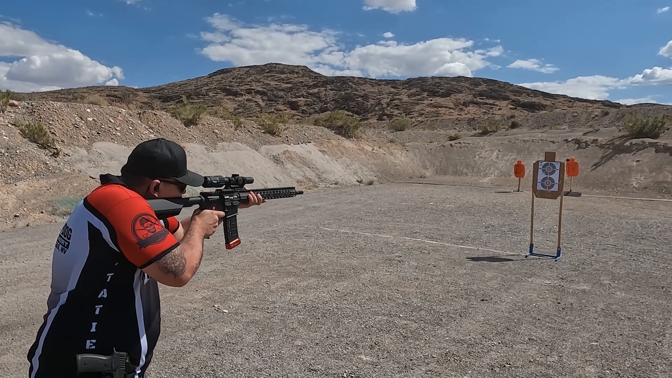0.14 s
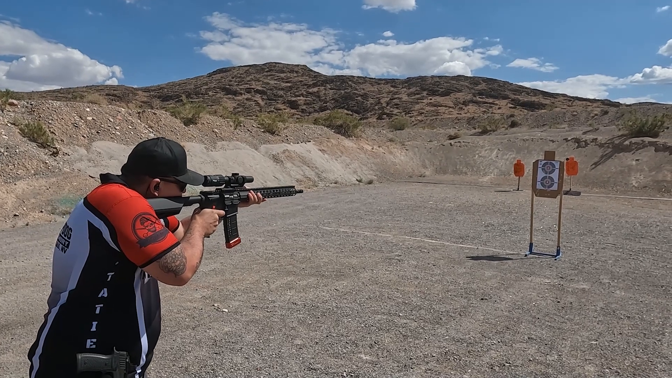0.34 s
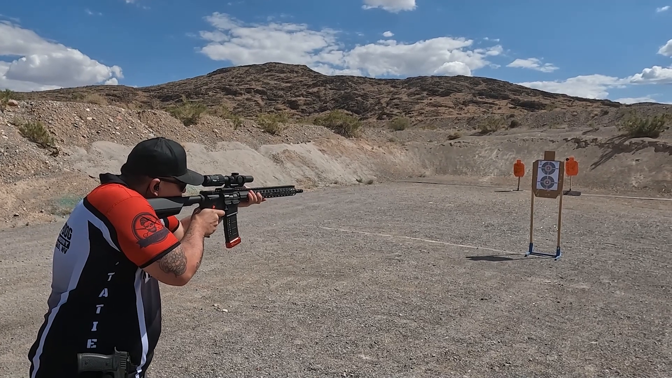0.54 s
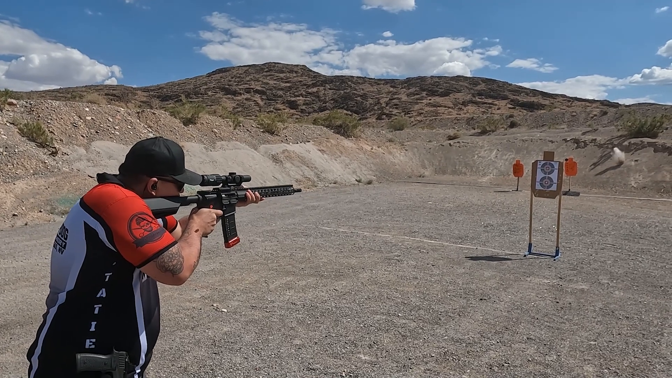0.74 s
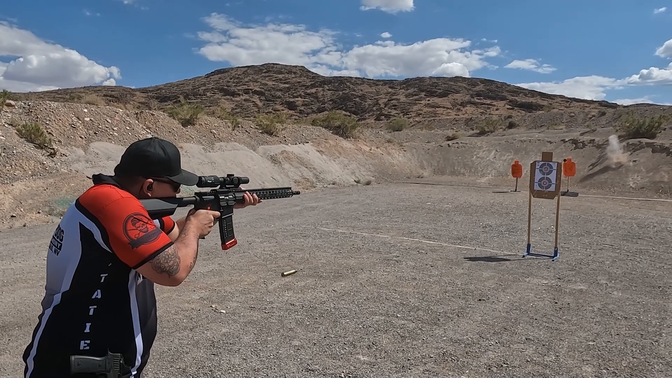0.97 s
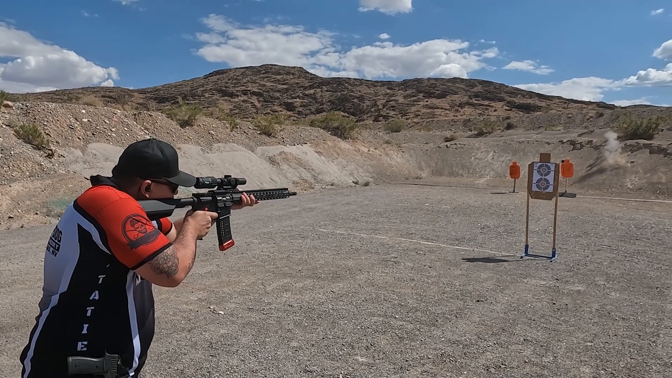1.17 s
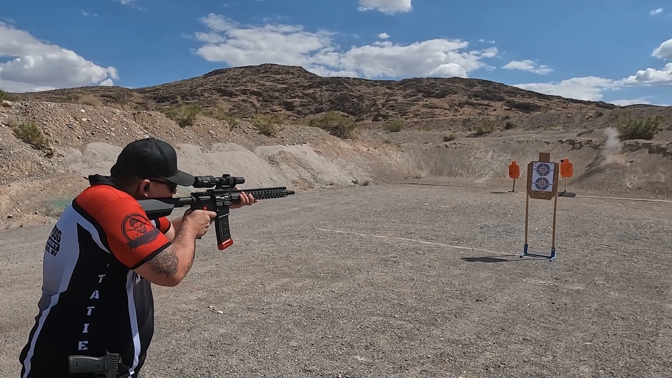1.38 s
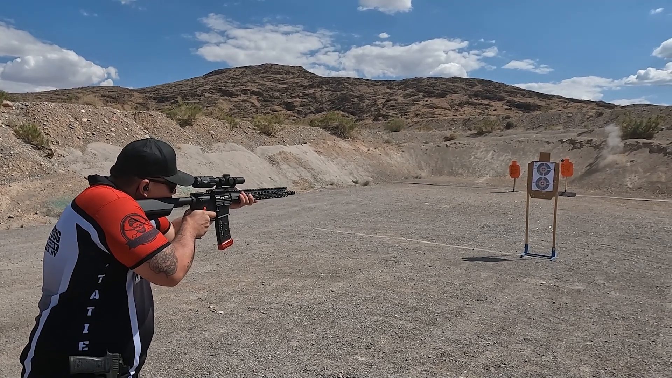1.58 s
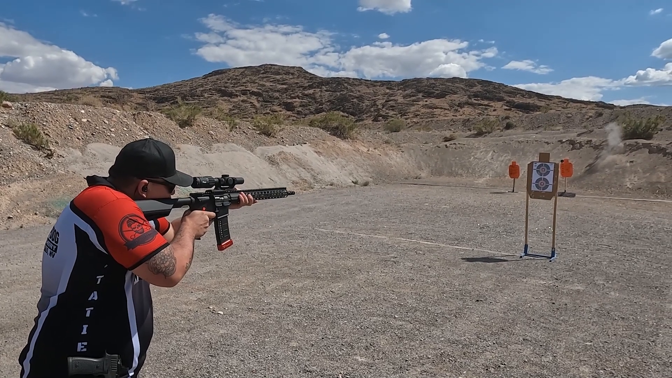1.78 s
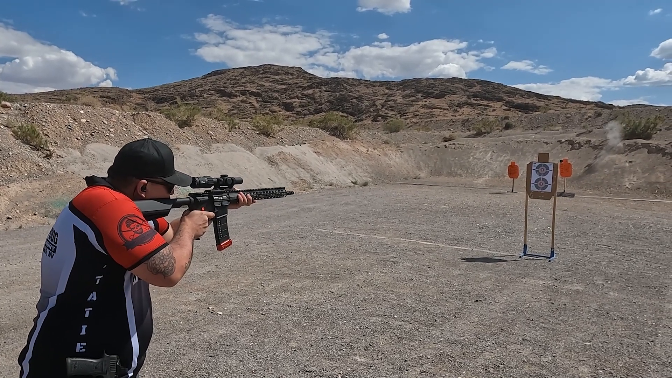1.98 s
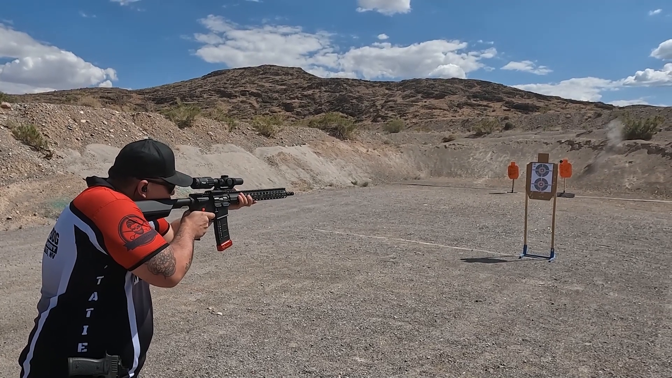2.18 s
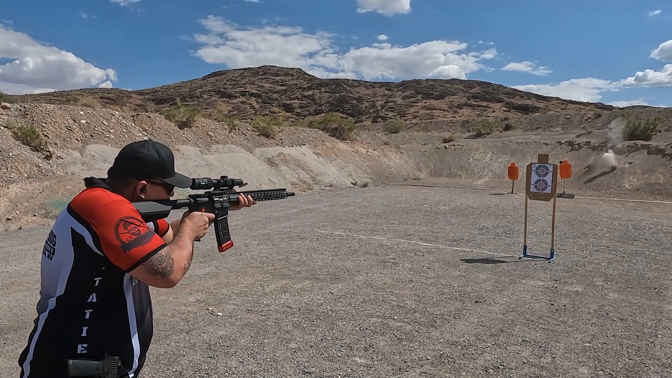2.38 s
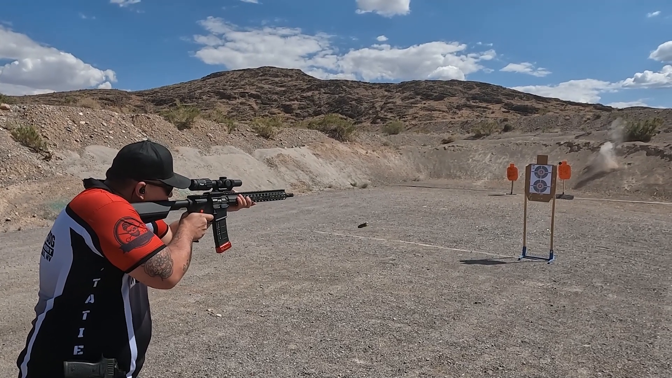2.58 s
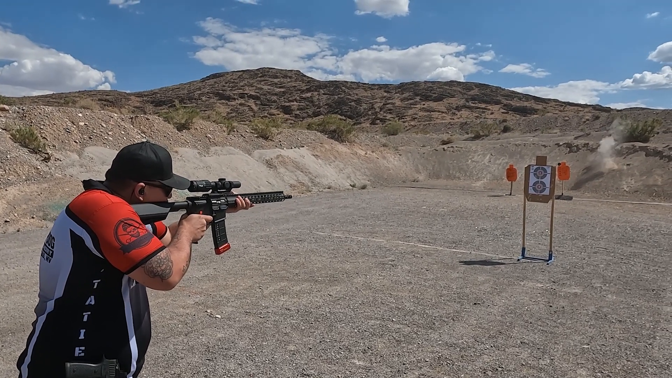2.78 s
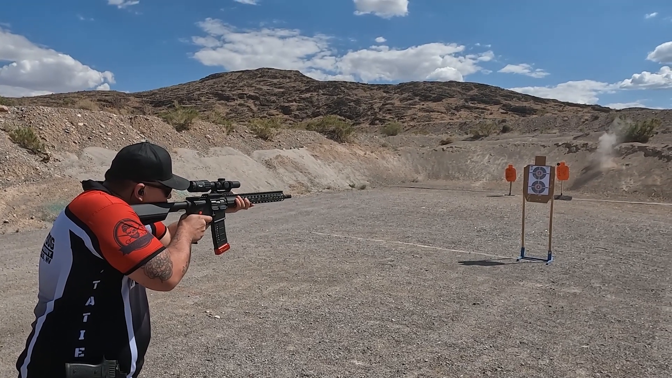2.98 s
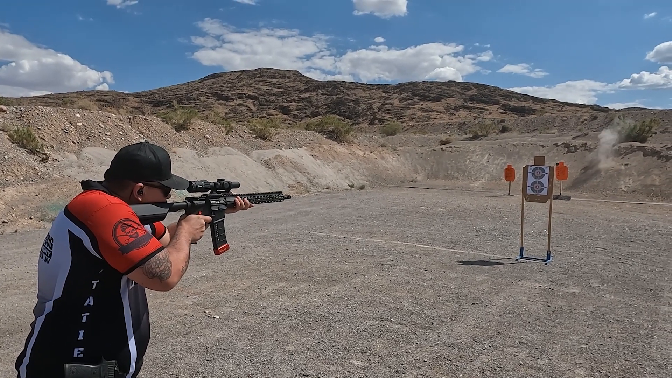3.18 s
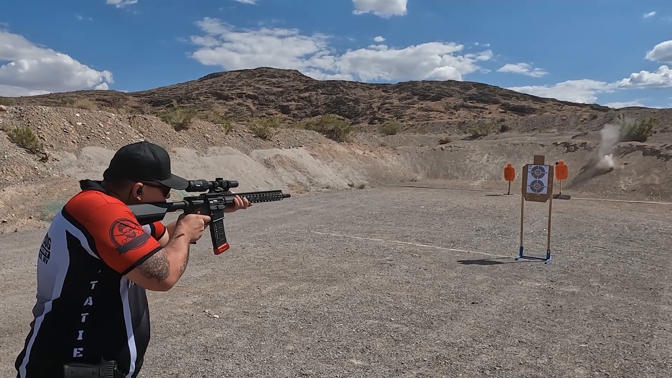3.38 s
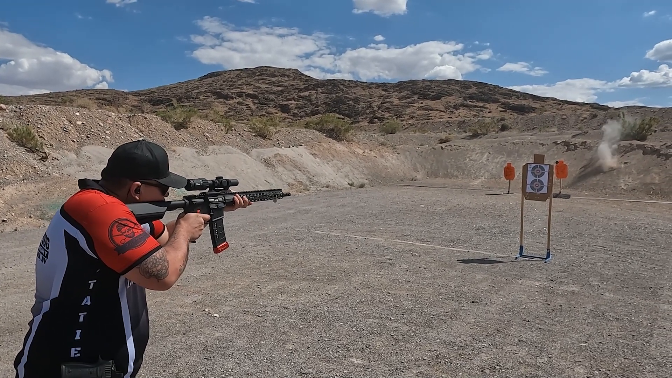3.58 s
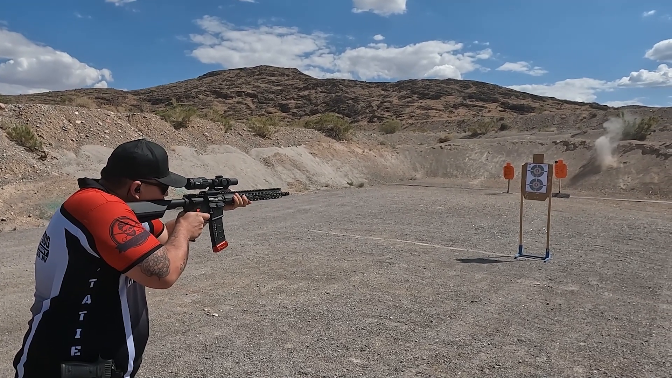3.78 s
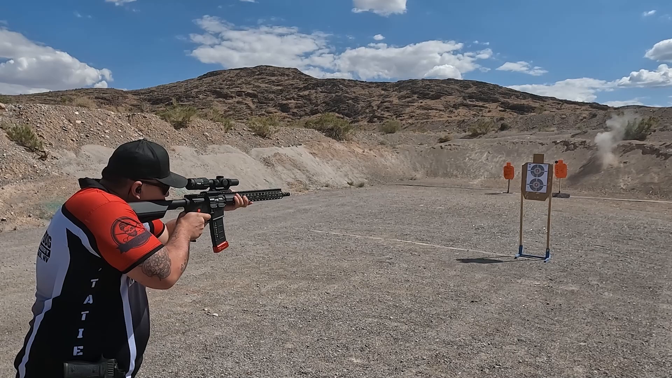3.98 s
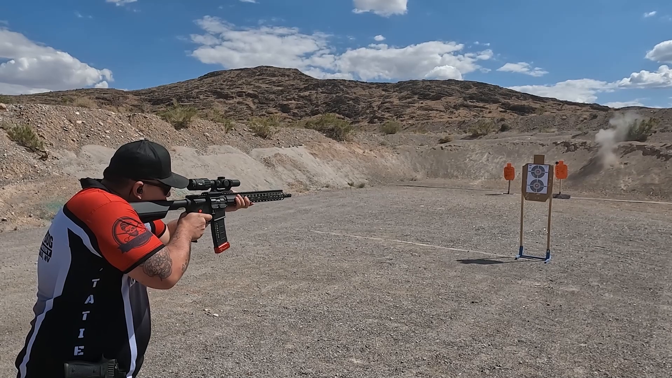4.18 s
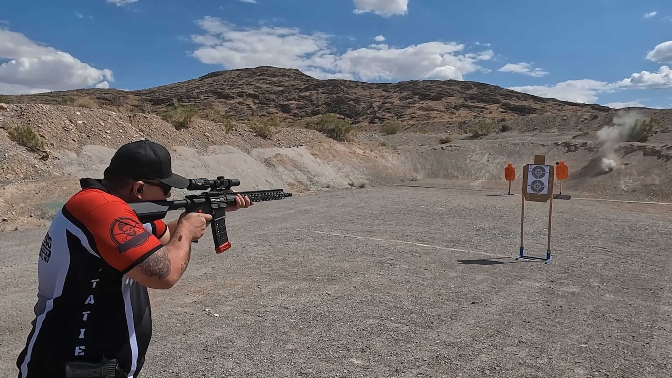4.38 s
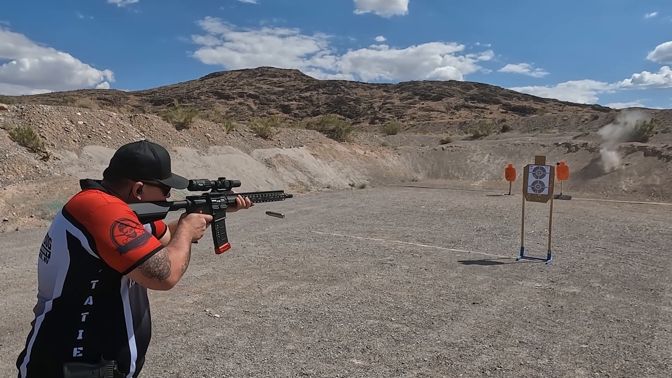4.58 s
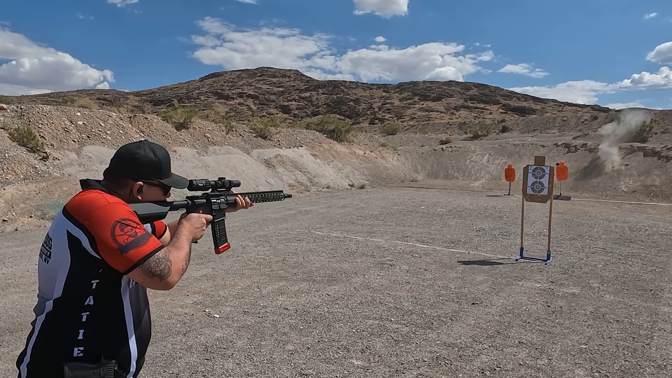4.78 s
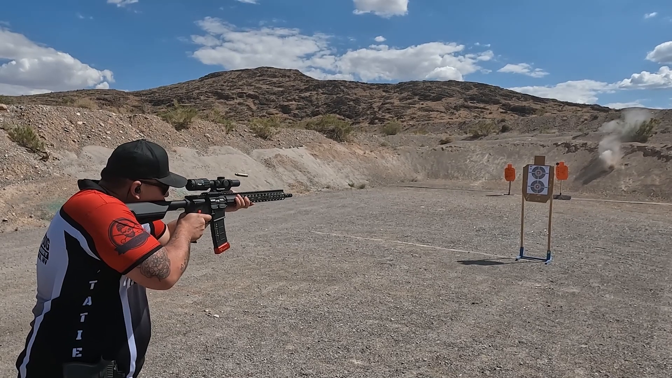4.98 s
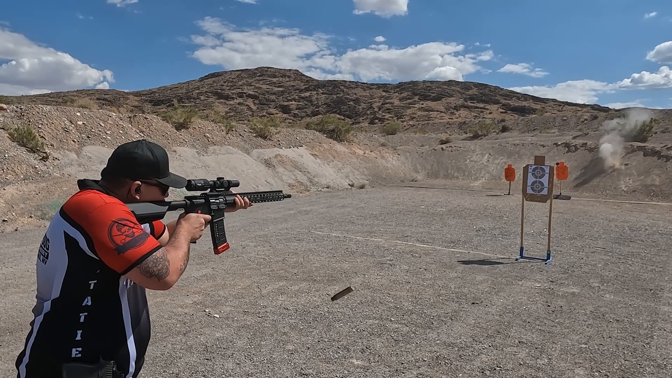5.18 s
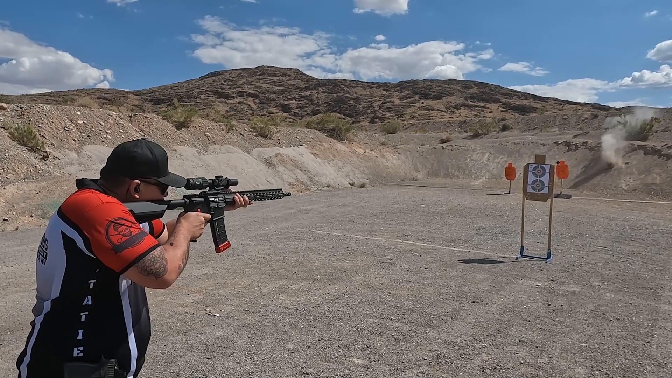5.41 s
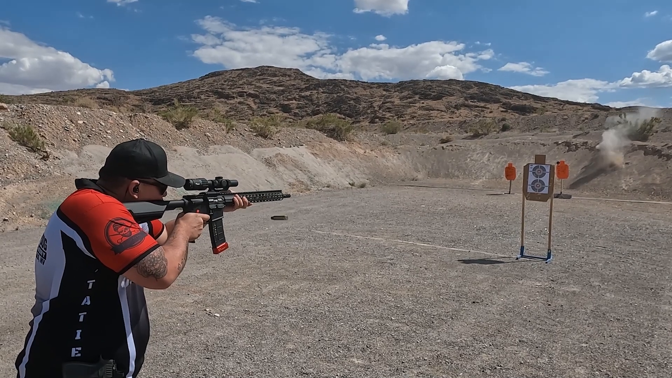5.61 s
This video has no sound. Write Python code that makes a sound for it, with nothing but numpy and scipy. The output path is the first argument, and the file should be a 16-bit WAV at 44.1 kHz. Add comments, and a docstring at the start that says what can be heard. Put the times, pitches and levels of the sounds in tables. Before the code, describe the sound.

Quiet outdoor air and faint grit underfoot, then a rifle fires close to the microphone. Six single shots follow, about a second or more apart at first, then every half second. Each is a dense, overloaded blast with a bolt crunch, spring ring and trigger click, then echoes from earth banks and hills. Spent cases tinkle on stones between shots. Nearly mono.

```python
"""Rifle shots in a gravel bay

Six shots from a self-loading rifle between earth banks, heard close by on a nearly mono microphone.
Each shot is a filtered-noise crack, a dense blast of noise bands and a low swing as the overloaded
microphone recovers. Bolt, spring and trigger follow as shaped noise and sines; short packets of waves
give a low thump and echoes from the banks, and coloured noise answers from the backstop and far hills.
Spent brass rings on the stones as split sines, grit ticks underfoot, and noise makes a light wind."""
import sys
import numpy as np
from scipy import signal
from scipy.fft import rfft, irfft
from scipy.io import wavfile
from scipy.ndimage import uniform_filter1d

SR = 44100
rng = np.random.default_rng(int(sys.argv[2]) if len(sys.argv) > 2 else 0)


def master_out(mix):
    """Clip the mix to full scale and print it as 16-bit PCM to the path in sys.argv[1]."""
    frames = np.transpose(np.atleast_2d(mix))
    ceiling = np.clip(frames, -1, 1)
    pcm = np.round(ceiling * 32767).astype(np.int16)
    wavfile.write(sys.argv[1], SR, pcm)


N = 249120
TIME = np.arange(N) / SR  # seconds into the scene
AGE = TIME[:2 * SR]  # seconds into one event


def from_db(db):
    """Decibels to gain."""
    return 10 ** (np.asarray(db) / 20)


def rms_one(x):
    """Scale each row to rms 1."""
    return x / np.sqrt(np.mean(np.abs(x) ** 2, axis=-1, keepdims=True) + 1e-20)


def at_hz(points, hz):
    """Read a spectrum on a log-frequency axis."""
    f, value = np.transpose(points)
    return np.interp(np.log(hz + 1e-9), np.log(f), value)


def humps(modes, hz):
    """Gain of a few broad resonances, added as power."""
    power = sum(from_db(2 * db) / (1 + (2 * (hz - f) / width) ** 2) ** 2 for f, width, db in modes)
    return np.sqrt(power)


def noise(gain_at, size):
    """Noise of rms 1 with a given gain at each frequency."""
    spectrum = rfft(rng.standard_normal(size))
    return rms_one(irfft(spectrum * gain_at(np.fft.rfftfreq(size, 1 / SR)), size))


def coloured(spectrum, size):
    """Noise of rms 1 with a given spectrum."""
    return noise(lambda hz: from_db(at_hz(spectrum, hz)), size)


def swell(s, db, rise_db_per_s, hold_s, fall_db_per_s):
    """Gain that rises to a peak at s, holds and falls, in straight lines of decibels."""
    before = np.maximum(s - AGE, 0)
    after = np.maximum(AGE - s - hold_s, 0)
    return from_db(db - rise_db_per_s * before - fall_db_per_s * after)


def dying(t60):
    """Exponential decay by 60 dB in t60 seconds."""
    return from_db(-60 * AGE / t60)


def add(track, s, sound):
    """Mix a sound in at a given time."""
    start = round(s * SR)
    track[start:start + len(sound)] += sound[:N - start]


# the six shots: start_s, level_db (of the blast alone)
SHOTS = [(0.7871, 0.3), (2.396, 0.53), (3.4253, 1), (4.4198, 0.3), (4.9340, 0.25), (5.4340, -0.5)]


def rifle():
    """Every shot adds a blast of its own level to a crack, heave, spring and echoes of fixed level."""
    out = np.zeros(N)
    every_time = crack() + heave() + thump_and_banks()
    for (s, level_db), blast in zip(SHOTS, blasts(len(SHOTS))):
        add(out, s, from_db(level_db) * blast)
        add(out, s, every_time + spring() + far_echoes())
    return out


# colour of the blast: pitch_hz, density_db (per Hz, relative)
BLAST_COLOUR = [(40, -3), (70, -3.5), (124, -6), (290, -4), (550, -6.5), (850, -11.5), (1200, -16),
                (3200, -25.5), (6500, -34), (8300, -34), (10500, -36.5), (13500, -45), (16000, -60)]
# pitches the bay's reflections strengthen or cancel: pitch_hz, width_hz, change_db
BAY = [(117, 42, 3.5), (236, 15, -4), (305.3, 7.2, 2), (375, 100, -5.5), (460, 40, 1), (563.6, 5.9, -7),
       (642, 100, 2), (810, 180, -3.5), (890, 41, 10.5), (960, 120, -1.5), (1185, 270, 1), (1660, 80, 2),
       (3200, 240, 0)]
# how alike the blast is from shot to shot: pitch_hz, share (0-1, of power)
SAMENESS = [(100, 0.86), (500, .93), (1300, 0.99), (3500, 0.3), (10000, 0)]


def blasts(shots, evenness=0.88, build_cycles=2.8, pivot_hz=900, ragged_db=2.5, ragged_hz=350, count=56):
    """The muzzle blast scattered by the gravel; the ground stays put, so its low part repeats."""
    age = AGE[:SR // 3]
    envelope, tilt_db = blast_life(age)
    hz = np.fft.fftfreq(len(age), 1 / SR)
    white = np.fft.fft(rng.standard_normal((shots + 1, len(age))))
    same = at_hz(SAMENESS, np.abs(hz))
    scatter = np.sqrt(same) * white[0] + np.sqrt(1 - same) * white[1:]
    # reflections arrive in clumps of a few milliseconds, which act mostly on the treble
    clumps = np.array([noise(lambda f: f * np.exp(-2 * f / ragged_hz), len(age)) for _ in range(shots)])
    edges = np.geomspace(330, 16800, count) - 300
    out, power = 0, 0
    for low, high in zip(edges, edges[1:]):
        centre = (low + high) / 2
        # positive frequencies only, so that the magnitude is the band's envelope
        band = np.fft.ifft(scatter * ((hz >= low) & (hz < high)))
        band = (band / np.abs(band) ** evenness).real  # evened out into a dense roar
        band = rms_one(band * from_db(ragged_db * clumps * centre / (centre + pivot_hz)))
        bay_db = sum(db / (1 + (2 * (centre - f) / width) ** 2) for f, width, db in BAY)
        gain = from_db(at_hz(BLAST_COLOUR, centre) + bay_db) * np.sqrt(high - low)
        build = 1 - np.exp(-age * centre / build_cycles)  # lows take longer to build up
        tilt = from_db(tilt_db * np.log2(centre / pivot_hz))
        out = out + band * gain * build * envelope * tilt
        power += gain ** 2
    return surges(age) * out / np.sqrt(power)


def blast_life(age, after_s=0.0056, attack_s=0.0015, level_db=-6.0):
    """The blast follows the crack, jumps up, sags while the near ground answers, then dies away."""
    hold_s, sag_db_per_s, release_db_per_s = 0.099, 85, 154
    # it starts bright and soon settles to a steady tilt
    flash_db_per_octave, flash_s, steady_db_per_octave = 6.5, 0.0099, 0.92
    since = np.maximum(age - after_s, 0)
    attack = 1 - np.exp(-since / attack_s)
    sag_db = sag_db_per_s * np.minimum(since, hold_s)
    release_db = release_db_per_s * np.maximum(since - hold_s, 0)
    tilt_db = steady_db_per_octave + flash_db_per_octave * np.exp(-age / flash_s)
    return attack * from_db(level_db - sag_db - release_db) * roar_end(age), tilt_db


def roar_end(age, end_s=0.24, fade_s=0.012):
    """The roar and the loud song of the spring stop short together."""
    return 1 / np.sqrt(1 + np.exp(np.minimum(2 * (age - end_s) / fade_s, 100)))


def surges(age, surge_db=1.5, surge_hz=90):
    """The same patches of ground return more or less of every blast, so it surges unevenly."""
    return from_db(surge_db * noise(lambda hz: hz * np.exp(-2 * hz / surge_hz), len(age)))


def crack(level_db=-19, centre_hz=1300, width_hz=1500, t60=0.02):
    """The short snap that runs ahead of the blast: a band of noise dying fast."""
    snap = noise(lambda hz: hz / (hz + centre_hz) / np.hypot(1, 2 * (hz - centre_hz) / width_hz), len(AGE))
    return from_db(level_db) * snap * dying(t60)


def heave(level_db=-9.5, flip_s=.055, swing_hz=7.9, fade_s=0.063, build_s=0.039):
    """A slow low swing as the overloaded microphone recovers: it rises, flips sign and rocks out."""
    since = AGE - flip_s
    rise = np.exp(-np.abs(since) / build_s) * np.minimum(AGE / flip_s, 1)
    rocking = -np.exp(-np.abs(since) / fade_s) * np.cos(2 * np.pi * swing_hz * since)
    swing = np.where(since < 0, rise, rocking)
    return from_db(level_db) * uniform_filter1d(swing, size=200)  # softens the flip


# bolt closing after each shot: start_s (middle of the crunch), level_db (before the trim)
BOLTS = [(0.89, -16), (2.486, -19), (3.518, -17.5), (4.504, -19), (5.023, -18.5), (5.519, -26)]


def bolt(length_s=0.0069, centre_hz=7000, width_hz=10000, trim_db=-3):
    """The bolt slams home in a bright crunch: broad noise under a short bell-shaped envelope."""
    out = np.zeros(N)
    for s, level_db in BOLTS:
        out += from_db(level_db + trim_db) * np.exp(-((TIME - s) / length_s) ** 2)
    return out * noise(lambda hz: humps([(centre_hz, width_hz, 0)], hz), N)


# resonances of the recoil spring: pitch_hz, width_hz, level_db (relative)
SPRING = [(6760, 1100, 5.5), (8630, 1500, 3.5), (10100, 1300, 3.5), (10870, 560, 4)]


def spring(ring_db=-69.5, ring_t60=2.6):
    """The recoil spring sings loudly just after the bolt closes, then rings on faintly."""
    song = swell(s=.138, db=-33, rise_db_per_s=700, hold_s=0.016, fall_db_per_s=135) * roar_end(AGE)
    ring = from_db(ring_db) * dying(ring_t60)
    return (song + ring) * noise(lambda hz: humps(SPRING, hz), len(AGE))


# trigger resets: start_s, level_db
RESETS = [(1.0509, -18.5), (2.6727, -17), (3.728, -16.5), (4.5925, -21), (5.106, -21.5), (5.607, -21)]
# dead knock of the action: pitch_hz, width_hz, level_db (relative)
ACTION = [(630, 140, -12), (1110, 140, -1), (1610, 530, -2), (2490, 780, -9), (3580, 670, -6),
          (5500, 2200, -18), (7500, 822, -15), (9260, 3500, -14.5), (13000, 2500, -35.5)]
# thud of the stock and ring of the steel: pitch_hz, level_db (relative to the reset), t60_s
STOCK_AND_STEEL = [(125, -1, 0.031), (594, 3, 0.015), (3500, -37, .26), (4619, -53, .14), (9350, -52, 0.28)]


def trigger(knock_s=0.00404, rattle_db=-22, rattle_t60=0.093):
    """The sear snaps back: a hard knock, a brief rattle, a thud of the stock and a faint ring of steel."""
    out = np.zeros(N)
    ring = sum(from_db(db) * np.sin(2 * np.pi * hz * AGE) * dying(t60) for hz, db, t60 in STOCK_AND_STEEL)
    shape = np.exp(-(AGE / knock_s) ** 4) + from_db(rattle_db) * dying(rattle_t60)
    for s, level_db in RESETS:
        knock = shape * noise(lambda hz: humps(ACTION, hz), len(AGE))
        add(out, s, from_db(level_db) * knock)
        add(out, s + knock_s / 2, from_db(level_db) * ring)
    return out


# a low thump and echoes from the banks: start_s (after the shot), pitch_hz, half_length_s, level_db
THUMP_AND_BANKS = [(.126, 53.55, 0.01, -19), (.128, 720, 0.00084, -8.5), (0.1339, 440, 0.0024, -5),
                   (0.151, 1078, 0.017, -27.5), (0.178, 285, 0.0055, -17.5), (.191, 540, .006, -23),
                   (0.214, 227, 0.0047, -22), (.31, 123.7, 0.023, -36.5)]


def thump_and_banks():
    """Short packets of waves after each shot: a low thump and echoes from the banks."""
    out = 0
    for s, hz, length, db in THUMP_AND_BANKS:
        wave = np.sin(2 * np.pi * hz * (AGE - s) + rng.uniform(0, 2 * np.pi))
        out = out + from_db(db) * np.exp(-((AGE - s) / length) ** 2) * wave
    return out


# Returns all have: start_s (after the shot), level_db, rise_db_per_s, hold_s, fall_db_per_s
# Colours all have: pitch_hz, density_db (per Hz, relative)
# the backstop's face and its wide flanks
BACKSTOP = [(.425, -33, 478, 0.027, 397), (0.42, -46, 65.5, 0.074, 76.5)]
BACKSTOP_COLOUR = [(150, -18), (330, -30.5), (450, -2.5), (660, 2.5), (740, -5), (840, 3), (1050, -9.5),
                   (1600, -19.5), (3000, -51), (12000, -81.5)]
# scrub and loose stones on the backstop, behind it and on the far hills, before the grain
SCRUB = [(.43, -42, 700, .015, 253), (.47, -51.5, 402, 0.077, 201.5), (.92, -65, 91, .3, 201)]
SCRUB_COLOUR = [(500, -1), (1400, 2), (2400, -3), (4000, -13.5), (6500, -25), (12000, -45)]
# the near and far hills
HILLS = [(.24, -40.5, 53, 0.022, 29), (.95, -51, 46, 0.12, 58)]
HILLS_COLOUR = [(40, -8.5), (90, -4), (140, -1.5), (250, -6), (450, -12.5), (900, -18), (1600, -26.5),
                (3000, -36), (6000, -51.5), (12000, -73)]


def far_echoes(grain_db=2.0, grain_hz=150):
    """The backstop answers, scrub scatters a grainy spray of treble and the hills roll on."""
    grain = from_db(grain_db * noise(lambda hz: np.exp(-hz / grain_hz), len(AGE)))
    return echo(BACKSTOP, BACKSTOP_COLOUR) + grain * echo(SCRUB, SCRUB_COLOUR) + echo(HILLS, HILLS_COLOUR)


def echo(returns, colour):
    """The returns from one kind of ground add as power and merge into a wash of its colour."""
    return np.sqrt(sum(swell(*row) ** 2 for row in returns)) * coloured(colour, len(AGE))


# spent cases landing: start_s, pitch_hz, ring_db (before the partials' gains), tick_db
CASES = [(1.505, 11460, -40, -42.5), (2.025, 11330, -66, -78), (3.141, 10460, -43.5, -42),
         (3.375, 10610, -60.5, -69), (4.191, 10590, -52, -49), (4.367, 10780, -51, -60),
         (5.301, 10600, -65, -61)]
# colour of the tick on stone: pitch_hz, density_db (per Hz, relative)
TICK_COLOUR = [(300, -11), (1200, 1), (3000, -15), (9000, -14.5), (12000, -17.5), (16000, -31)]


def brass(ring_t60=0.2, tick_t60=0.07, split_hz=60, overtone=1.42, overtone_db=-20):
    """A case ticks on a stone and rings; its slightly oval mouth splits the note in two."""
    out = np.zeros(N)
    for s, hz, ring_db, tick_db in CASES:
        # the overtone is 14 dB below the stronger half of the note
        partials = [(hz - split_hz / 2, 1 / 4), (hz + split_hz / 2, 1 / 2),
                    (hz * overtone, from_db(overtone_db))]
        ring = sum(gain * np.sin(2 * np.pi * f * AGE) for f, gain in partials) * dying(ring_t60)
        tick = coloured(TICK_COLOUR, len(AGE)) * dying(tick_t60)
        add(out, s, from_db(ring_db) * ring + from_db(tick_db) * tick)
    return out


# grit shifting underfoot: start_s, level_db, bright_hz
GRIT = [(.036, -52.5, 1600), (0.09, -60, 1800), (0.463, -53, 1000), (0.481, -53.5, 1490), (.66, -61, 2000),
        (1.851, -52, 3500), (3.997, -50, 4000)]


def grit(t60=0.025):
    """Small stones tick as the stance settles: dulled noise that dies at once."""
    out = np.zeros(N)
    for s, level_db, bright_hz in GRIT:
        tick = noise(lambda hz: 1 / (1 + (hz / bright_hz) ** 2), len(AGE))
        add(out, s, from_db(level_db) * tick * dying(t60))
    return out


# colour of still air and wind: pitch_hz, density_db (per Hz, relative)
AIR = [(12, -23.5), (20, 2), (31, -11.5), (44, -15), (81, -28.5), (127, -27), (170, -35), (310, -34),
       (513, -40.5), (1500, -50), (4000, -56.5), (9000, -60), (16000, -63.5)]


def air(floor_db=-48, gust_db=-58, gust_hz=22, lumpy_db=4, lump_hz=4):
    """A quiet floor of noise with slow lumps of low wind on the microphone."""
    lumps = from_db(lumpy_db * noise(lambda hz: np.exp(-hz / lump_hz), N))
    wind = noise(lambda hz: hz / (gust_hz + hz) / (1 + (hz / gust_hz) ** 2), N)
    return from_db(floor_db) * coloured(AIR, N) + from_db(gust_db) * lumps * wind


def scene(side_db=-21, side_hz=5000, leak_db=-46):
    """Nearly all is central; the two microphone channels differ a little, mostly in the treble."""
    mid = rifle() + bolt() + trigger() + brass() + grit() + air()
    treble = signal.sosfilt(signal.butter(2, side_hz, "high", fs=SR, output="sos"), mid)
    stray = from_db(side_db) * treble + from_db(leak_db) * mid
    side = stray * noise(lambda hz: np.exp(-hz / 200), N)  # diffuse, with no steady direction
    return np.array([mid + side, mid - side])


def record(dry, ceiling=1.02, cutoff_hz=15900):
    """The loudest peaks are rounded off and the top is cut."""
    rounded = dry / (1 + (dry / ceiling) ** 6) ** (1 / 6)
    return signal.sosfilt(signal.ellip(10, .1, 70, cutoff_hz, fs=SR, output="sos"), rounded)


dry = scene()
out = record(dry)
master_out(out)
```